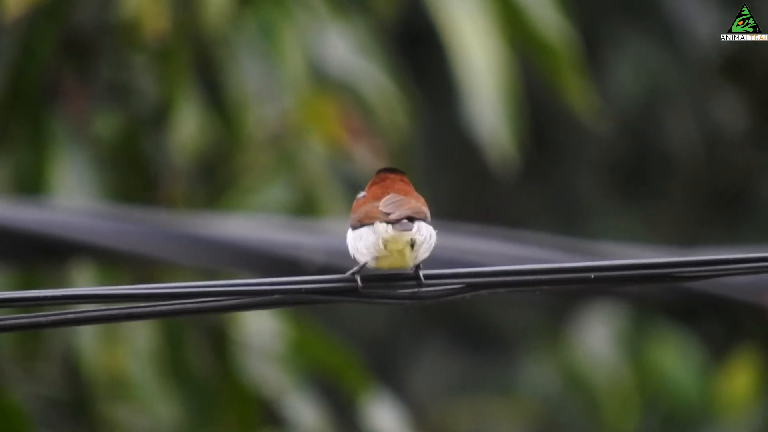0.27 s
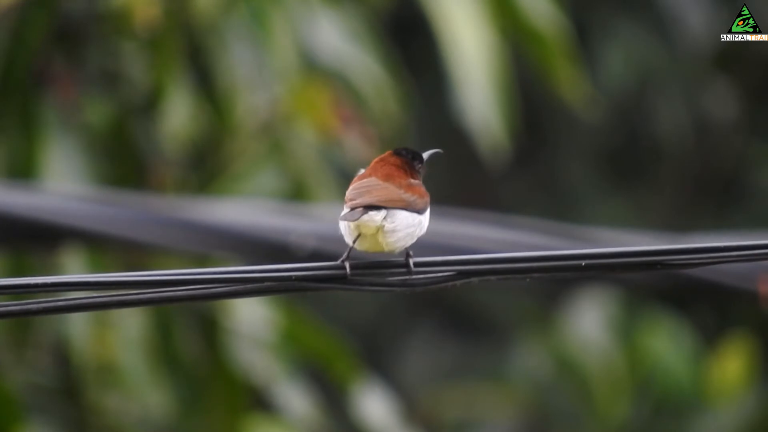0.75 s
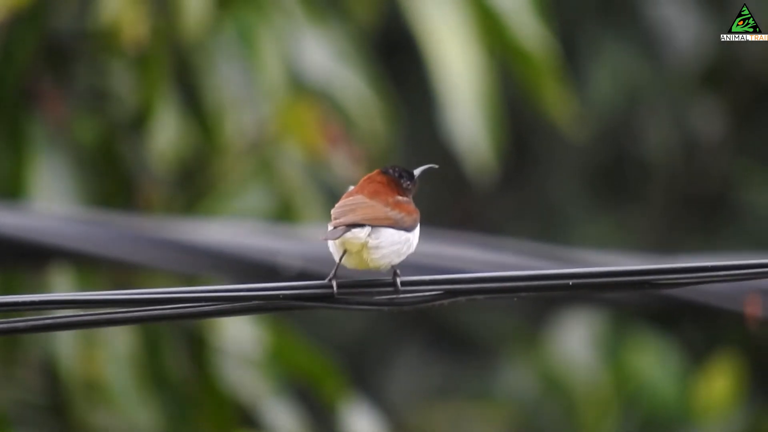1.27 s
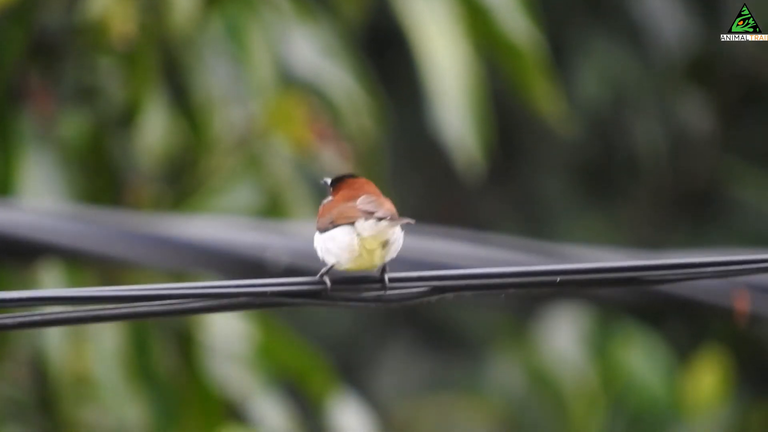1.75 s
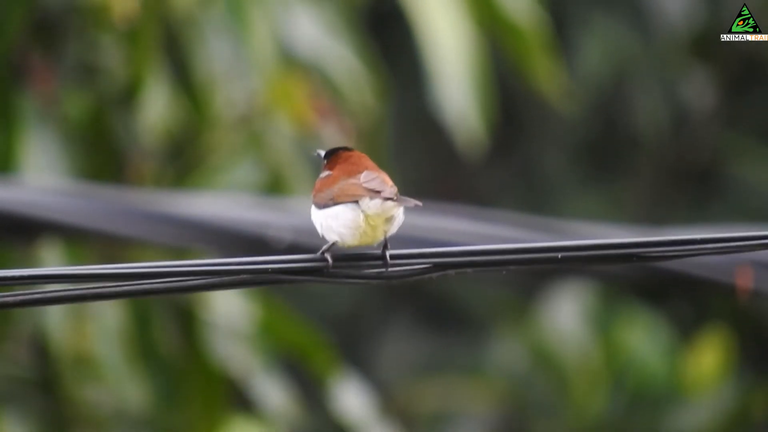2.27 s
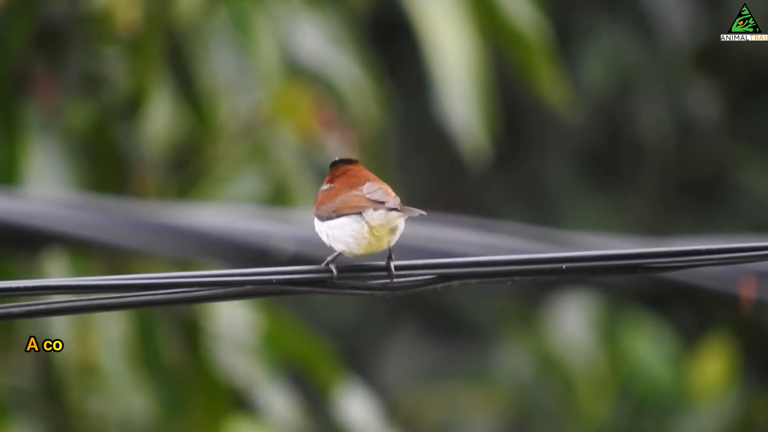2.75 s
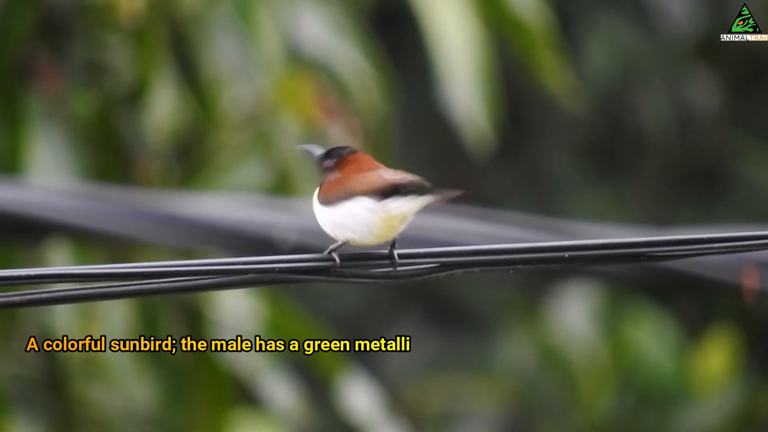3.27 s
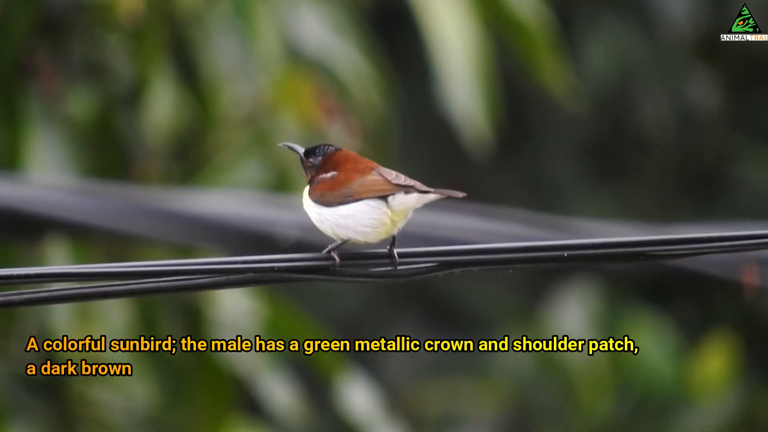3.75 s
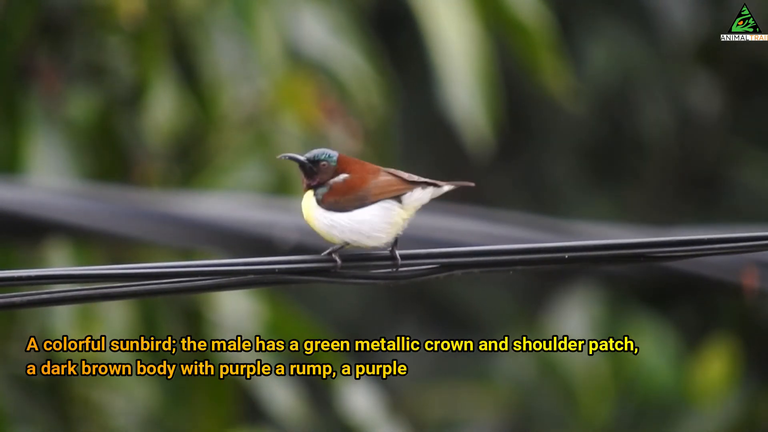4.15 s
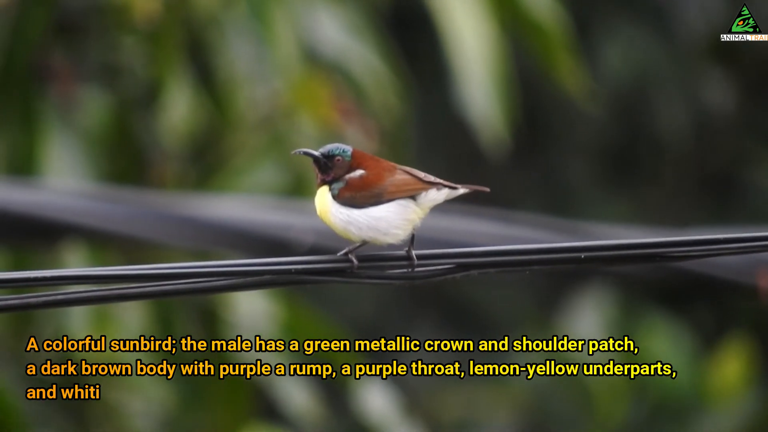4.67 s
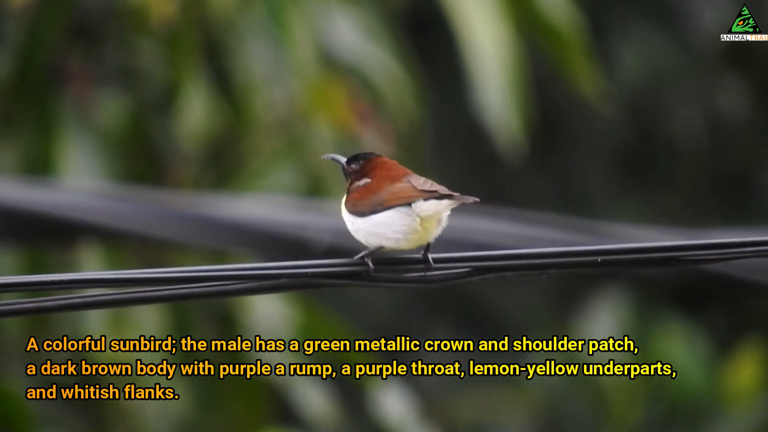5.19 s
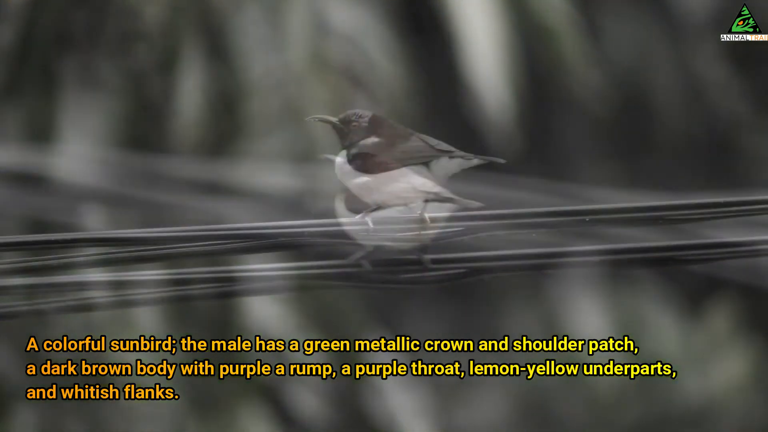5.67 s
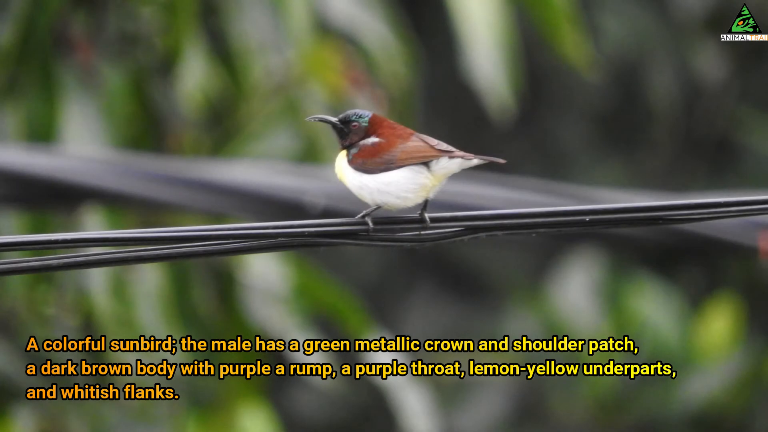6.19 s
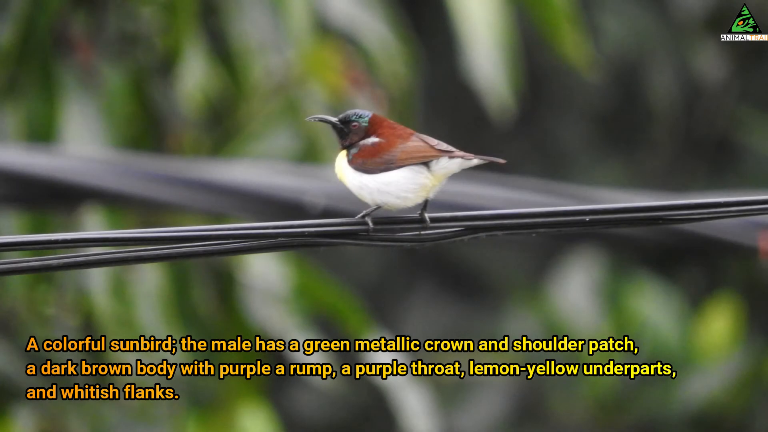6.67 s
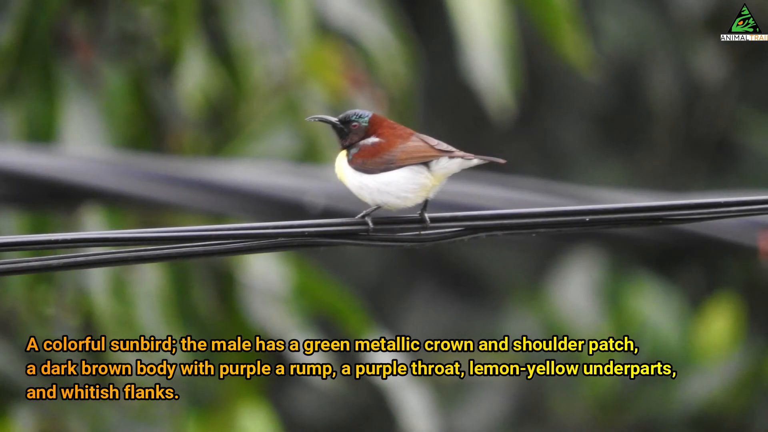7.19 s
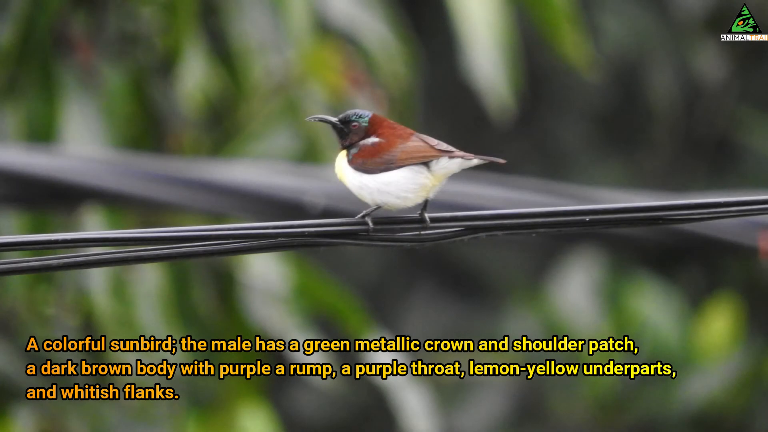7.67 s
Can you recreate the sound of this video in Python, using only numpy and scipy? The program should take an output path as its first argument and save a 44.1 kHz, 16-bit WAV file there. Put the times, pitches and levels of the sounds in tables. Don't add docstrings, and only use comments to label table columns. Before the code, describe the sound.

A small sunbird sings three short phrases of quick, thin, high whistled twitters outdoors, over soft hiss, faint hum and distant traffic.

```python
import sys
import numpy as np
from scipy import signal
from scipy.fft import next_fast_len
from scipy.io import wavfile
from scipy.ndimage import uniform_filter1d

SR = 44100
rng = np.random.default_rng(int(sys.argv[2]) if len(sys.argv) > 2 else 0)


def ratio(d):
    e = np.asarray(d, float) / 20
    return 10 ** e


def int16_out(signal):
    q = np.round(np.clip(np.atleast_2d(signal).T, -1, 1) * 32767)
    wavfile.write(sys.argv[1], SR, q.astype(np.int16))


N = 349699


def level(x, db):
    return x * ratio(db) / np.sqrt(np.mean(x ** 2))


def walk(rate, size=N):
    hold = int(SR / rate)
    steps = np.repeat(rng.standard_normal(size // hold + 1), hold)
    smooth = uniform_filter1d(uniform_filter1d(steps, hold), hold)
    return 1.3 * smooth[:size]


def band(x, lo_hz, hi_hz):
    return signal.sosfilt(signal.butter(2, [lo_hz, hi_hz], "band", fs=SR, output="sos"), x)


def whistle(strokes, edge_ms, flutter_db, wobble, rate):
    out = np.zeros(N)
    flutter, waver = walk(rate), walk(rate)
    edge = edge_ms / 1000
    for stroke in strokes:
        s, hz, db = np.transpose(stroke)
        i = np.arange(max(int((s[0] - edge) * SR), 0), min(int((s[-1] + edge) * SR), N))
        t = i / SR
        slope = np.diff(hz) / np.diff(s)
        run_on = slope[0] * np.minimum(t - s[0], 0) + slope[-1] * np.maximum(t - s[-1], 0)
        round_off = max(len(i) // (3 * len(s)), 1)
        pitch = uniform_filter1d(np.interp(t, s, hz) + run_on, round_off, mode="nearest")
        pitch = pitch * (1 + wobble * waver[i])
        gain = ratio(uniform_filter1d(np.interp(t, s, db), round_off) + flutter_db * flutter[i])
        fade = np.clip(np.minimum(t - t[0], t[-1] - t) / (1.5 * edge), 0, 1)
        envelope = gain * np.sin(np.pi / 2 * fade) ** 2
        out[i] += np.sqrt(2) * envelope * np.sin(2 * np.pi * np.cumsum(pitch) / SR)
    return out


def sing(shape, rows, lag_ms=0, db=0):
    ms, hz, shape_db = np.transpose(shape)
    along = ms / ms[-1]
    strokes = []
    for s, level_db, cents, fade_db, *bend in rows:
        time = s + (ms + lag_ms) / 1000
        pitch = hz * 2 ** ((cents + sum(bend) * along) / 1200)
        loudness = shape_db + level_db + db + fade_db * along
        strokes.append(np.transpose([time, pitch, loudness]))
    return strokes


# (frequency [Hz], density [dB per Hz])
HISS_COLOUR = [(28, -22.5), (45, -11), (80, 0.5), (200, -2.5), (330, -3.5), (600, -2.5), (1100, -7),
               (1900, -6), (3400, -7), (3900, -5), (5500, -6.5), (6400, -13.5), (7200, -26)]


def hiss():
    f, db = np.transpose(HISS_COLOUR)
    out = 0
    for hz in 28 * 2 ** np.arange(0, 8.2, 1 / 3):
        colour_db = np.interp(np.log(hz), np.log(f), db) + .5 * walk(6)
        noise = band(rng.standard_normal(N), hz * 2 ** (-1 / 6), hz * 2 ** (1 / 6))
        out = out + ratio(colour_db) * noise
    return level(signal.sosfilt(signal.butter(6, 6900, fs=SR, output="sos"), out), -58.5)


# (frequency [Hz], level [dB rms])
HUM_LINES = [(50.0, -77.5), (179, -81.5), (199.5, -77), (252, -76.5), (300.3, -73.5), (360, -81.5),
             (600, -79.5), (1190, -83.5), (1211, -83.5), (1784, -76.5), (2105, -82), (2982, -77),
             (3025, -85)]


def hum():
    t = np.arange(N) / SR
    out = np.zeros(N)
    for hz, db in HUM_LINES:
        out += np.sqrt(2) * ratio(db + 1.2 * walk(2.5)) * np.sin(2 * np.pi * (hz * t + rng.random()))
    return out


# (time of peak [s], peak level [dB], rise [s], fall [s])
VEHICLES = [(0.128, -68, .1, .9), (1.661, -58, .07, .4), (2.12, -65, .05, .2), (2.34, -58, .04, .2),
            (2.85, -63.5, .1, .5), (4.24, -60, .25, .1), (4.6, -62.5, .15, .4), (4.99, -56, .15, .1),
            (5.26, -58, .15, .05), (6.2, -64, .9, .8), (7.31, -60, .15, .3), (7.75, -64.5, .04, .4)]


def traffic():
    t = np.arange(N) / SR
    swell = ratio(-76.5)
    for s, db, rise, fall in VEHICLES:
        away = np.where(t < s, (s - t) / rise, (t - s) / fall)
        swell = swell + ratio(db - 15 * away)
    return swell * level(band(rng.standard_normal(N), 160, 320), -8.0)


# (time [s], frequency [Hz], level [dB])
MACHINE_WHINE = [(0, 575, -82), (2.0, 570, -75), (3.2, 572.7, -81), (4.5, 575, -74.5), (6.1, 573.5, -76),
                 (6.17, 591, -62), (6.23, 581, -67), (6.3, 584.5, -73), (6.52, 594, -72), (6.7, 583, -72.5),
                 (7.9, 580.3, -86)]
# (time [s], frequency [Hz], level [dB])
MACHINE_OVERTONE = [(4.6, 1156, -83.5), (4.95, 1149, -78.5), (5.05, 1150, -70.5), (5.48, 1147, -73),
                    (5.56, 1149, -83.5), (6.9, 1149, -79), (7.2, 1143, -73), (7.5, 1144, -83.5)]
# (time [s], frequency [Hz], level [dB])
TRANSFORMER_BUZZ = [(0, 101, -67.5), (.9, 100.3, -83.5), (1.1, 100.8, -68), (2.0, 100, -69),
                    (2.499, 100.5, -83), (3.0, 99.6, -75), (4.2, 100, -68), (4.5, 99.4, -78),
                    (5.601, 100.2, -70.5), (6.4, 100.2, -73), (6.8, 98.6, -80.5), (7.9, 100.3, -67)]


def whine():
    tones = [MACHINE_WHINE, MACHINE_OVERTONE, TRANSFORMER_BUZZ]
    return whistle(tones, edge_ms=50, flutter_db=-0.5, wobble=.001, rate=6.6)


def insects():
    return level(band(rng.standard_normal(N), 3780, 3960) * ratio(1.5 * walk(3.6)), -72.0)


# (phrase end [s], [(delay [ms], level [dB])])
CLOSE_PATHS = [
    (2.0, [(4.2, -13), (8.2, -14), (11.6, -17), (17, -21), (24, -24)]),
    (4.0, [(2.87, -13), (4.3, -15), (8.75, -13), (27, -27), (37, -27)]),
    (8.0, [(2.9, -13), (3.8, -14), (5.6, -16), (35, -28)]),
]


def leaves(song):
    out, start = song.copy(), 0
    for end, paths in CLOSE_PATHS:
        part = np.zeros(N)
        part[start:int(end * SR)] = song[start:int(end * SR)]
        for ms, db in paths:
            out += ratio(db) * np.roll(part, int(ms * SR / 1000))
        start = int(end * SR)
    return out


# (delay [s], level [dB], smear [ms])
WALL_ECHOES = [
    (.044, -33, 7.0),
    (.108, -26.5, 5.5),
]
# (reverberation time T60 [s], level [dB])
DIFFUSE_TAILS = [
    (.07, -17),
    (.2, -31),
    (.8, -27),
]


def garden(scattered, beamed):
    t = np.arange(SR) / SR
    tail, echo = np.zeros(SR), np.zeros(SR)
    for t60, db in DIFFUSE_TAILS:
        tail += level(rng.standard_normal(SR) * ratio(-60 * t / t60), db) / np.sqrt(SR)
    for lag, db, ms in WALL_ECHOES:
        smear = rng.standard_normal(SR) * (t > lag) * np.exp(-np.abs(t - lag) * 1000 / ms)
        echo += level(smear, db - 1.5) / np.sqrt(SR)
        echo[int(lag * SR)] += ratio(db - 5.5)
    analytic = signal.hilbert(scattered, next_fast_len(N))[:N]
    swayed = np.real(analytic * np.exp(2.2j * walk(500)))
    diffuse = signal.fftconvolve(swayed + ratio(-10) * beamed, tail)[:N]
    return band(diffuse + signal.fftconvolve(beamed, echo)[:N], 3400, 7000)


# (time [s], length [ms], first pitch [Hz], last pitch [Hz], level [dB])
FAR_GLIDES = [(.531, 9.4, 4960, 5995, -53), (.782, 8.5, 5000, 5940, -50.5), (2.589, 22, 6950, 6380, -61.5),
              (2.638, 9.8, 4950, 4780, -62), (5.346, 40, 6600, 6800, -51.5), (5.384, 20, 6850, 6050, -51),
              (5.475, 13, 6900, 7040, -60), (5.487, 8.4, 5170, 6500, -55.5), (5.533, 28, 6690, 5930, -49),
              (5.61, 59, 7100, 6140, -62.5), (5.68, 32, 7020, 5920, -48)]


def far_strokes():
    strokes = []
    for s, ms, first, last, db in FAR_GLIDES:
        start = (s, first, db - 9.5)
        peak = (s + 0.96 * ms / 1000, first + .65 * (last - first), db)
        strokes.append([start, peak, (s + ms / 1000, last, db - 4)])
    return strokes


# (time [ms], pitch [Hz], level [dB])
FAR_SLIDE_SHAPE = [(0, 6200, -8), (13.1, 6200, -3), (30.98, 5650, -1), (49.3, 5350, -3), (75, 4650, -14.5),
                   (95, 4050, -20)]
# (time [s], level [dB], pitch [cents], fade [dB])
FAR_SLIDE_TIMES = [
    (2.765, -51, 9.5, -1.5),
    (5.964, -50, -10, 1.5),
]


def neighbour():
    strokes = far_strokes() + sing(FAR_SLIDE_SHAPE, FAR_SLIDE_TIMES)
    return leaves(whistle(strokes, edge_ms=3.9, flutter_db=4.5, wobble=0.0091, rate=220))


# (time [ms], pitch [Hz], level [dB])
FIRST_FLICK_SHAPE = [(0, 4500, -7.5), (2.5, 5000, -1.5), (5, 5630, -4.5)]
LOW_FLICK_SHAPE = [(0, 3350, -30), (3, 4250, -17), (5.2, 4950, -2.5), (7.6, 6000, -.5), (9.4, 6550, -12)]
LONG_FLICK_SHAPE = [(0, 4600, -10), (2.5, 5050, -2.5), (6, 5800, -3), (9.5, 6250, 1.5), (13, 6600, -6.5),
                    (19, 6350, -8)]
CHIP_FLICK_SHAPE = [(0, 4498, -12.5), (4, 5150, -1), (8, 5800, -3.5)]
CHIP_TWIN_SHAPE = [(0, 4500, -12), (3.3, 4700, -2.5), (6.6, 5760, -2), (10.5, 6330, -10.5)]
# (time [s], level [dB], pitch [cents], fade [dB], bend [cents])
OPENING_TIMES = [
    (0.63, -26, 20, 3.5, 70.5),
    (.811, -22, 5.5, 0.5, 20),
    (2.8841, -19.5, 30, -1.5, -40),
    (3.046, -19.5, 5, 1, -60),
    (4.5575, -19.5, 18, -1, 5),
    (4.7234, -18.5, -10, 2, -29.5),
]
# (time [s], level [dB], pitch [cents], fade [dB], bend [cents])
CHIP_TIMES = [
    (1.1342, -25, 42, 6, -75.5),
    (3.221, -16, -10.5, -3, 4.5),
    (4.893, -16.5, -26, -0.5, 21.5),
    (5.2991, -17, 89.5, -4, -90),
]


def flicks():
    openings = sing(FIRST_FLICK_SHAPE, OPENING_TIMES, db=-11.5)
    openings += sing(LOW_FLICK_SHAPE, OPENING_TIMES, lag_ms=3, db=-3)
    openings += sing(LONG_FLICK_SHAPE, OPENING_TIMES, lag_ms=13.2)
    chips = sing(CHIP_FLICK_SHAPE, CHIP_TIMES, db=-10.5)
    chips += sing(CHIP_TWIN_SHAPE, CHIP_TIMES, lag_ms=2.2, db=-10.5)
    return whistle(openings + chips, edge_ms=2.4, flutter_db=6.0, wobble=0.006, rate=600)


# (time [ms], pitch [Hz], level [dB])
HOLD_SHAPE = [(0, 6560, -2), (7.935, 6780, -.5), (15.88, 6870, -.5), (26, 6890, -1.7)]
# (time [s], level [dB], pitch [cents], fade [dB], bend [cents])
HOLD_TIMES = [
    (.667, -36.5, 38, 3.5, -27),
    (.850, -32, 40.5, 5.5, -46),
    (2.922, -38, -32, -4, 5),
    (3.081, -30, 5.5, -2, 4.5),
    (4.592, -28.5, -90, -2, 39),
    (4.758, -28.5, -77, -4.5, 48),
]


def holds():
    return whistle(sing(HOLD_SHAPE, HOLD_TIMES), edge_ms=8.0, flutter_db=3.0, wobble=0.0031, rate=400)


# (time [ms], pitch [Hz], level [dB])
SLIDE_SHAPE = [(0, 7400, -28), (9.1, 6490, -2.5), (18.3, 5980, -1), (27.4, 5500, -4.5), (41, 5130, -2),
               (57, 4950, -2.5), (73, 4690, -5), (88, 4230, -18.5), (110, 3480, -33)]
# (time [s], level [dB], pitch [cents], fade [dB])
SLIDE_TIMES = [
    (3.365, -10, 19, -2),
    (5.04, -10.5, -19, -1),
]
SLIDE_LINGER = [
    4.9,
    -2.5,
]


def slides():
    ms = np.transpose(SLIDE_SHAPE)[0]
    warp = np.sin(np.pi * ms / ms[-1])
    strokes = sing(SLIDE_SHAPE, SLIDE_TIMES)
    return [stroke + np.outer(warp * linger / 1000, [1, 0, 0])
            for stroke, linger in zip(strokes, SLIDE_LINGER)]


# (time [ms], pitch [Hz], level [dB])
DROP_SHAPE = [(0, 7250, -16), (3.8, 6880, -8.5), (7.5, 6600, -1.5), (11.3, 6350, -1.5), (15.1, 6220, -6),
              (19.06, 6120, -11), (28, 6060, -19.5)]
# (time [s], level [dB], pitch [cents], fade [dB], bend [cents])
DROP_TIMES = [
    (.7005, -14.5, 4, -13.5, -32),
    (.883, -14, 5, -8, -13),
    (2.954, -18, 20.5, -5, -21.5),
    (3.1215, -15, -20, 3.5, 30),
    (4.6285, -15, -7, -10.5, -50),
    (4.797, -14, 15, 2.5, 19),
]
# (time [ms], pitch [Hz], level [dB])
PIP_SHAPE = [(0, 6350, -1.5), (4, 6950, -.5), (10, 6900, -5)]
# (time [s], level [dB], pitch [cents], fade [dB])
PIP_TIMES = [
    (3.33, -41, 5, -1.5),
    (5.001, -50.5, 5, -1.5),
]
# (time [ms], pitch [Hz], level [dB])
ARCH_SHAPE = [(-2.5, 3450, -24), (4.5, 4200, -16), (8.4, 5020, -2.5), (10, 5080, -1.5), (19.1, 4970, 0),
              (24, 4740, -3), (27.48, 4350, -15), (32, 3600, -27)]


def glides():
    strokes = sing(DROP_SHAPE, DROP_TIMES) + sing(PIP_SHAPE, PIP_TIMES)
    strokes += sing(ARCH_SHAPE, CHIP_TIMES, lag_ms=8.8) + slides()
    return whistle(strokes, edge_ms=3.9, flutter_db=3.0, wobble=0.0031, rate=300)


def scene():
    background = hiss() + hum() + traffic() + whine() + insects()
    far = neighbour()
    quick, slow = flicks(), holds() + glides()
    scattered = ratio(11) * quick + slow + ratio(15.5) * far
    beamed = ratio(2.5) * quick + slow + ratio(13) * far
    return (background + far + garden(scattered, beamed) + leaves(quick + slow))[None]


def roll_off(x):
    return signal.sosfilt(signal.butter(12, 15720, fs=SR, output="sos"), x)


def record(dry):
    x = signal.sosfilt(signal.cheby1(9, .05, 7100, fs=SR, output="sos"), dry)
    loudness = np.sqrt(uniform_filter1d(x ** 2, 700) + 1e-12)
    grit = band(rng.standard_normal(N), 9500, 15500) * ratio(3.0 * walk(200))
    x = x + ratio(-63.5) * loudness * grit + ratio(-85.5) * rng.standard_normal(x.shape)
    x[:, int(2.583 * SR)] += ratio(-46)
    return roll_off(x)


dry = scene()
out = record(dry)
int16_out(out)
```